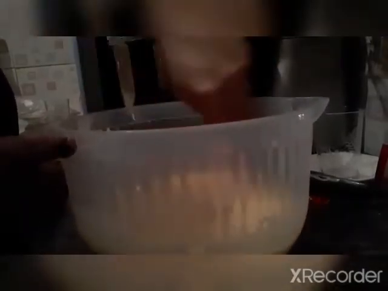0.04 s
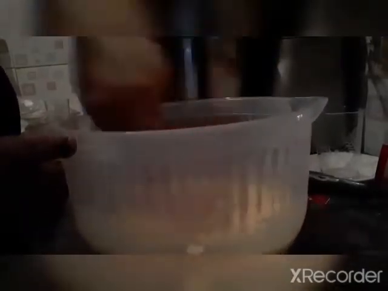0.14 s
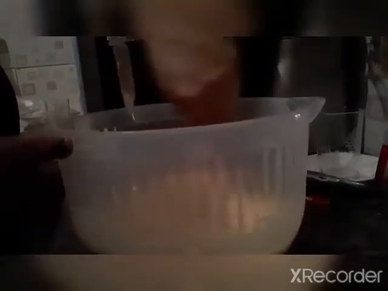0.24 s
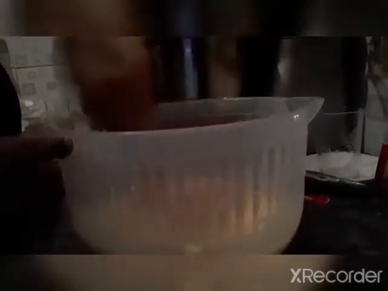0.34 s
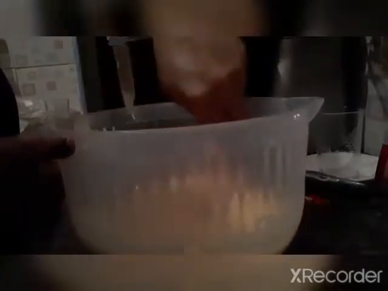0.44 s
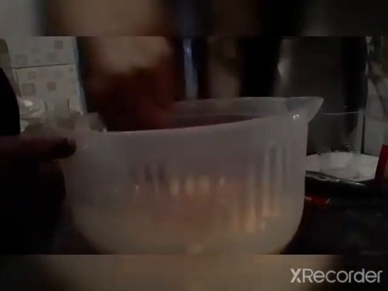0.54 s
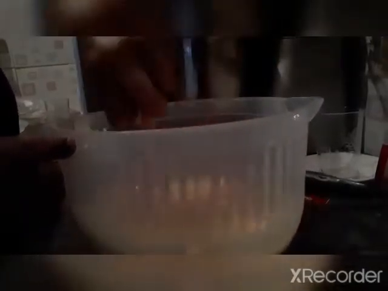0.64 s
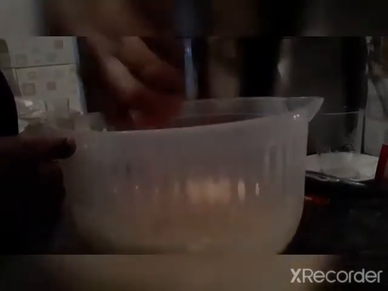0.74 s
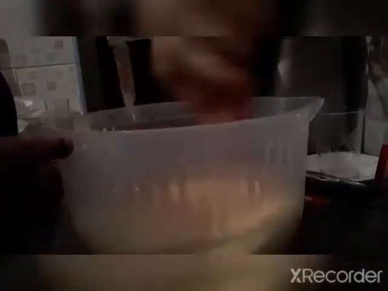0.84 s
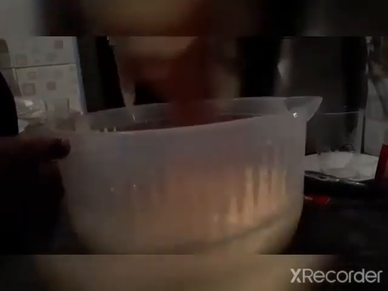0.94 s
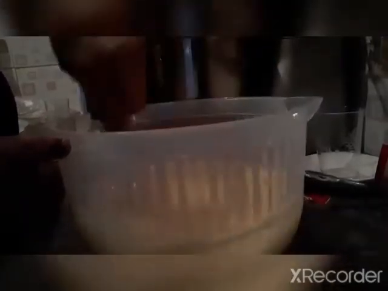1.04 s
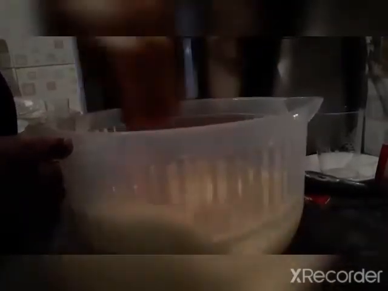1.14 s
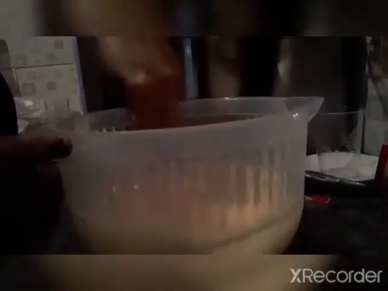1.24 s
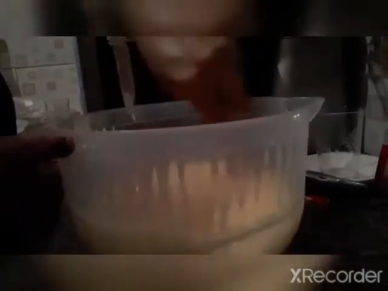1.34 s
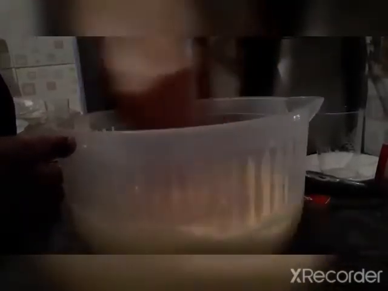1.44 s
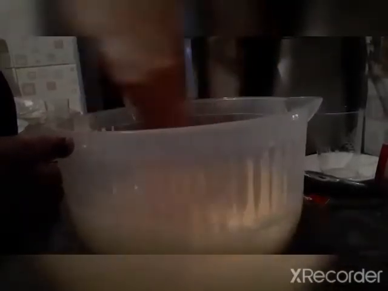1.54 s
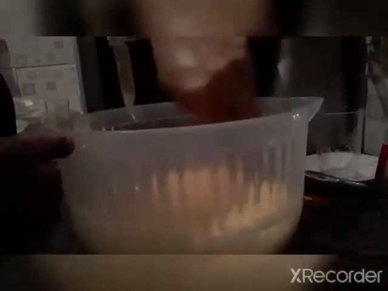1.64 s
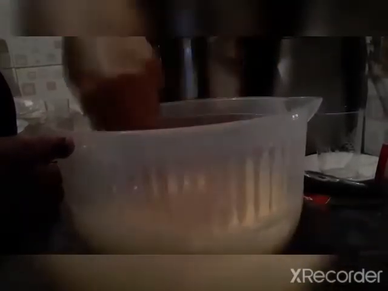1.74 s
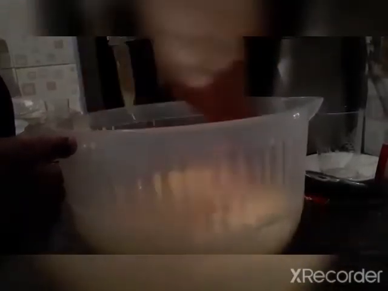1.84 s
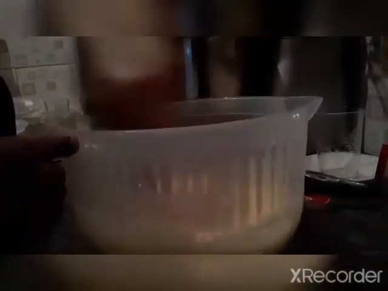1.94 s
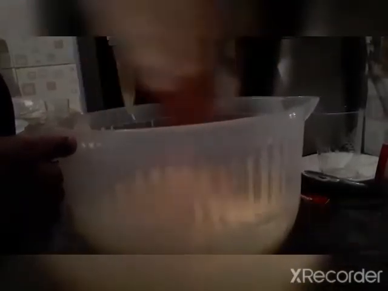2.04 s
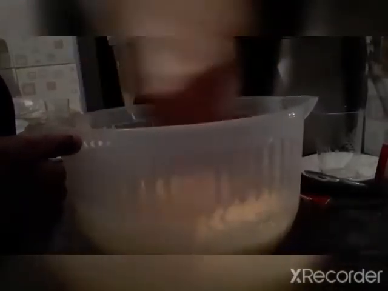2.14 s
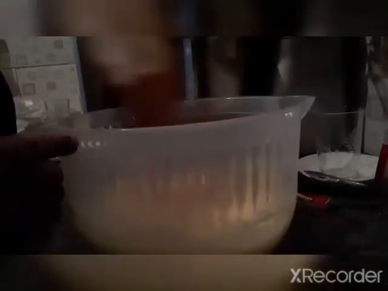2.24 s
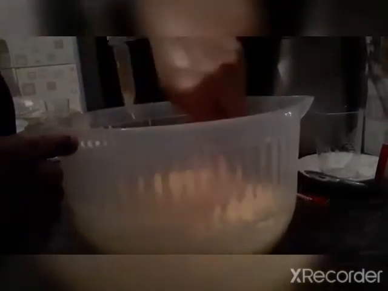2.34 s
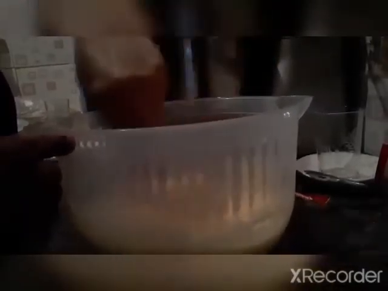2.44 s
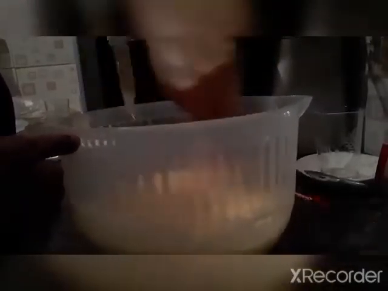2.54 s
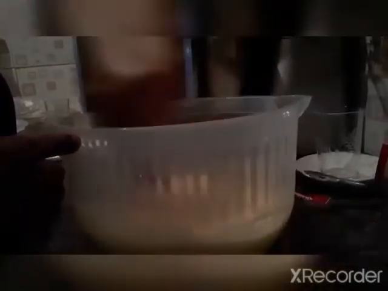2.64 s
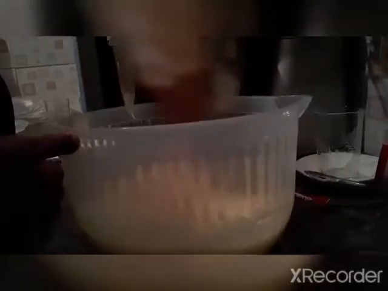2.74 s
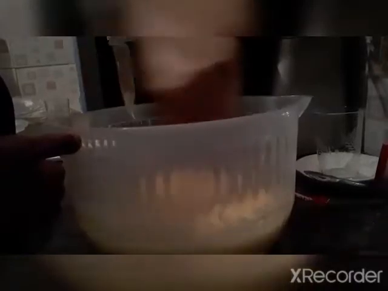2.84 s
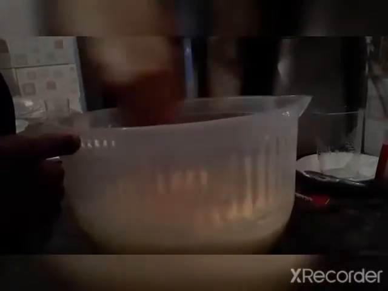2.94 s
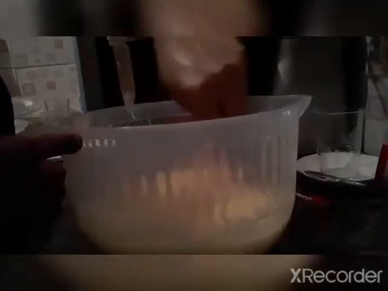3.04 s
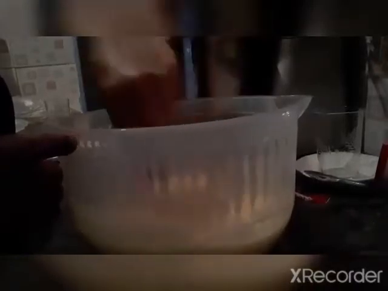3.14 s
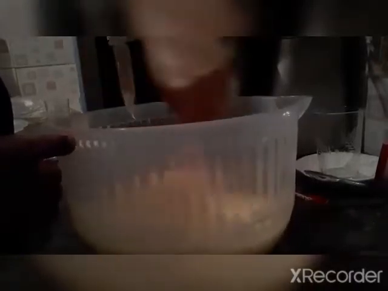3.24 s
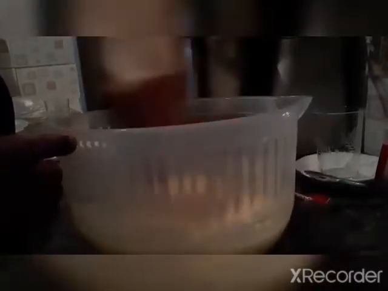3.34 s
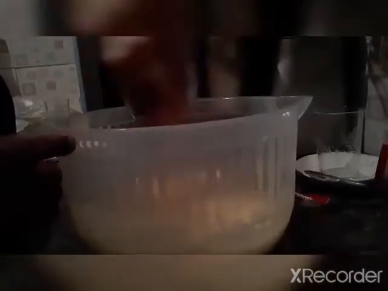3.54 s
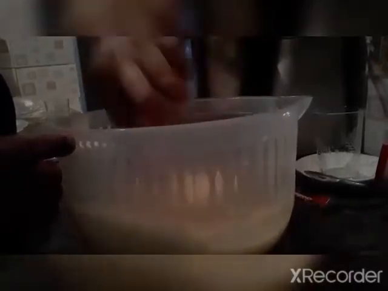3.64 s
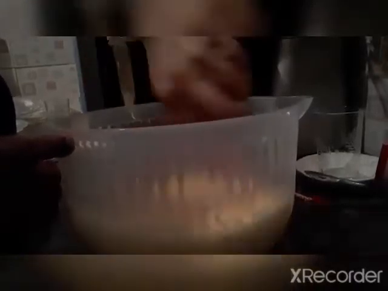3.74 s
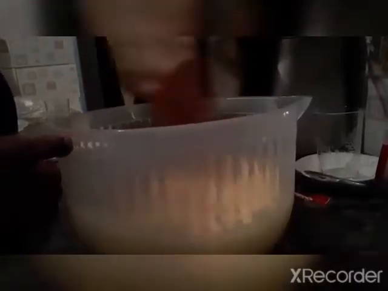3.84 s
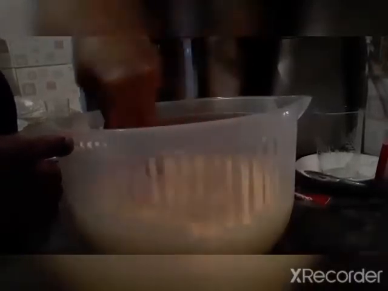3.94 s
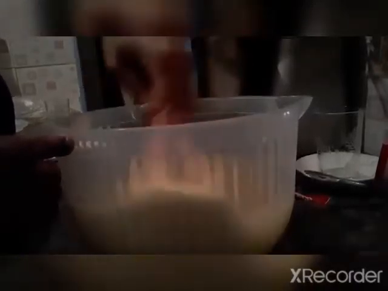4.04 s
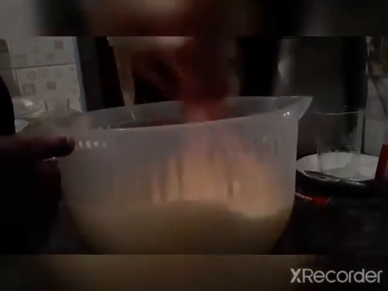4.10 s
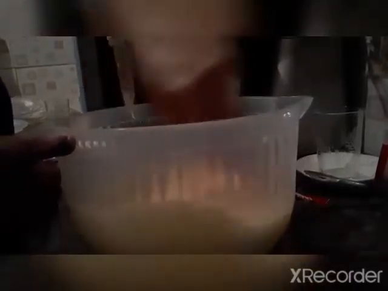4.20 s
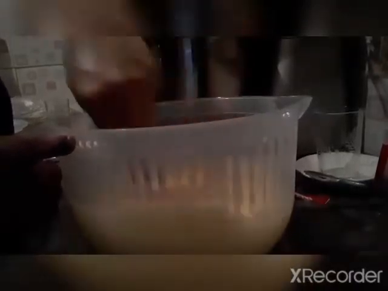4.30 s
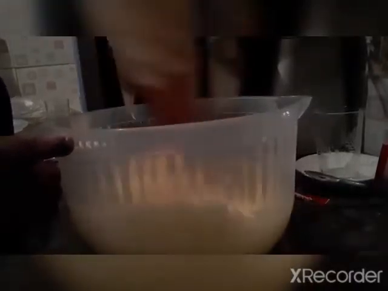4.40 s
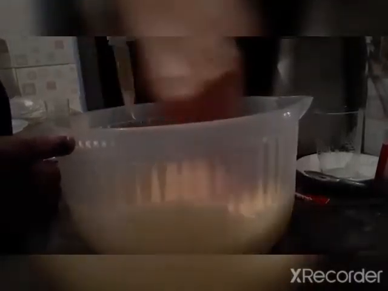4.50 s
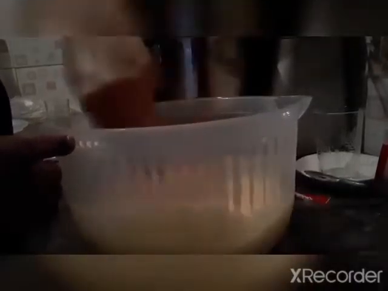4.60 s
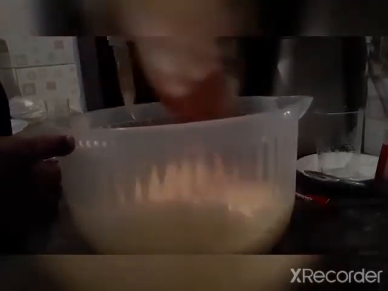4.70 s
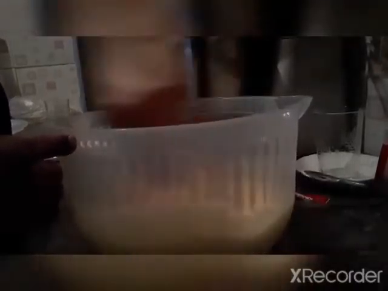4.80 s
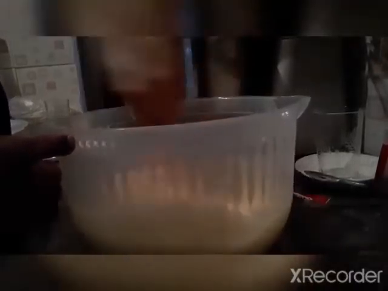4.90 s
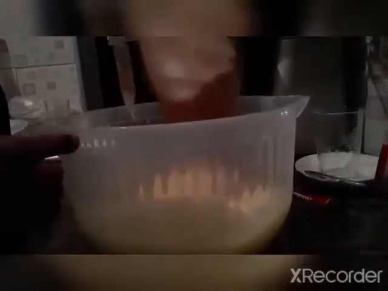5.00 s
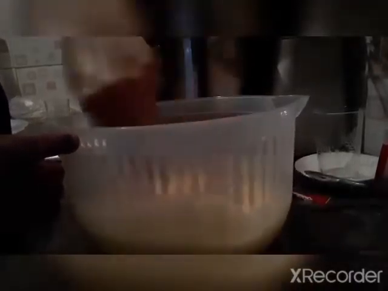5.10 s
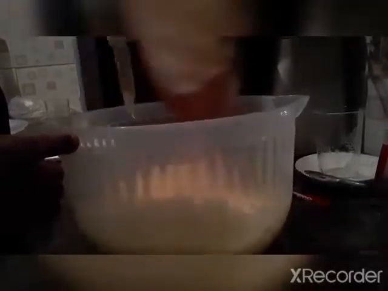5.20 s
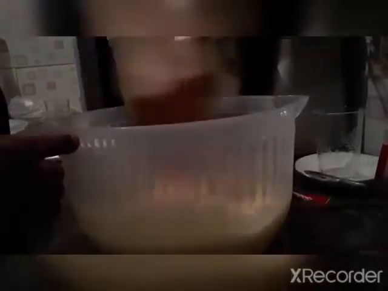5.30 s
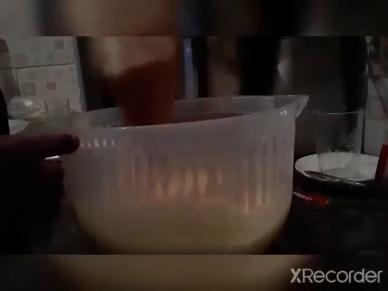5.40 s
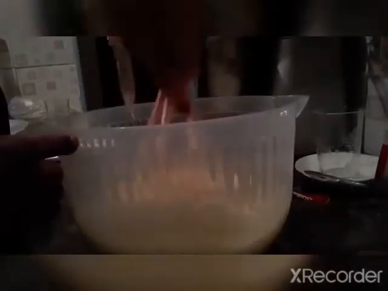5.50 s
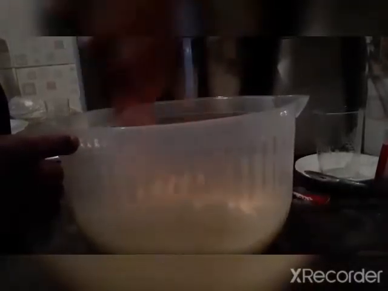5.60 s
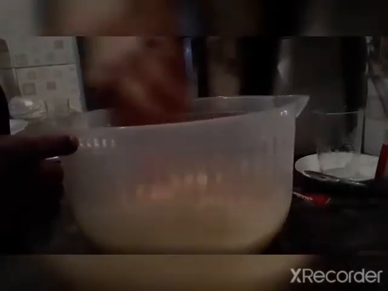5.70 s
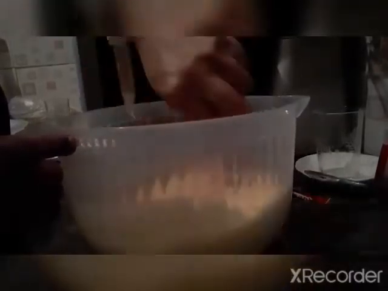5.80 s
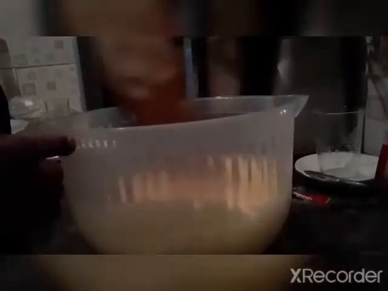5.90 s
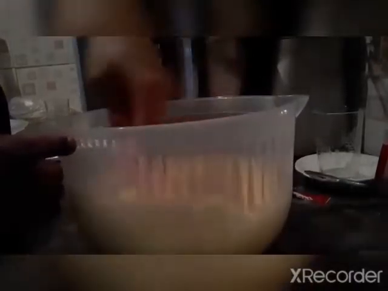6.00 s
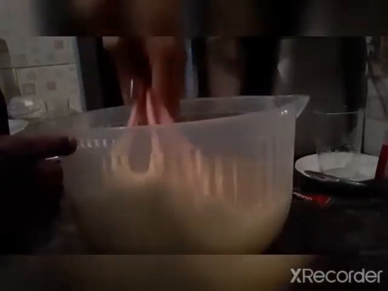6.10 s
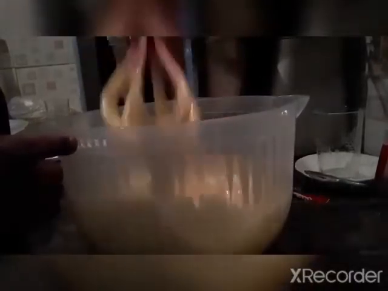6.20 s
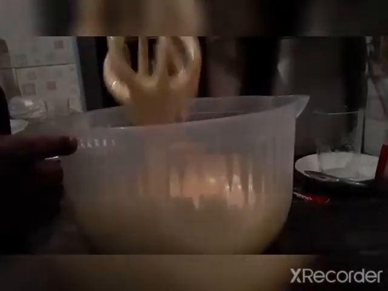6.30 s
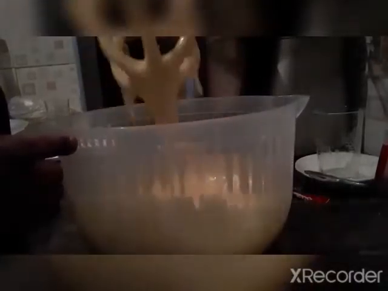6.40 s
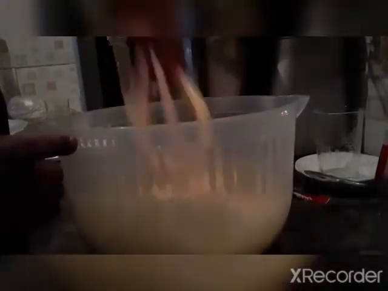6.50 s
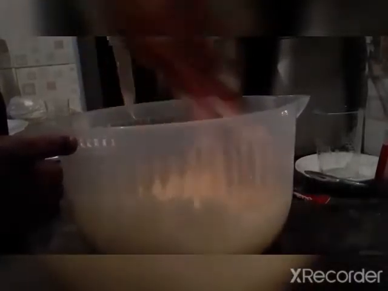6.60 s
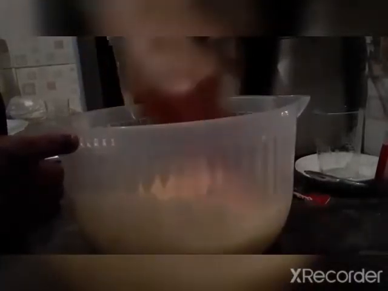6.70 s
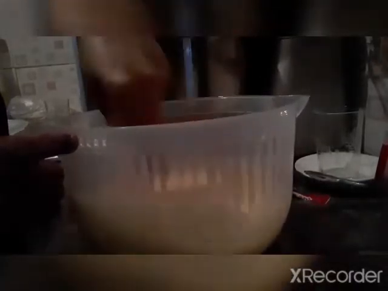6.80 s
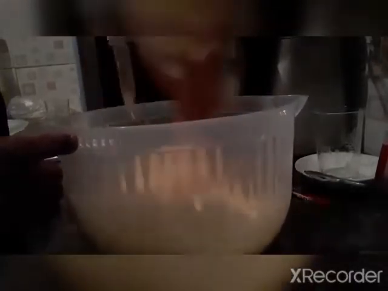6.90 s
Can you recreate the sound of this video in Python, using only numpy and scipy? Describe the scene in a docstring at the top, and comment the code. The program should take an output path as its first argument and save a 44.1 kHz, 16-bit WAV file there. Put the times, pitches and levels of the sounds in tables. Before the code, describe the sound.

Close, busy whisking of batter in a hollow plastic bowl: clacks, wiry ticks, wet scrapes and low plops in a small kitchen.

```python
"""A wire whisk beats thick batter in a plastic bowl on a kitchen counter, close to small stereo ports.
Wires strike the bowl as short noisy forces through resonances; scrape, churn and crackle are random grains
through the wall, the bowl and a wet colour, swelling with each sweep. Batter slaps the bowl or folds over
an air pocket: short low plops and bowl tones, sines rising slightly in pitch, with a noisy bowl shake.
The bowl booms, a small kitchen answers with decaying noise, over rumble and faint hiss."""
import sys
import numpy as np
from scipy import signal
from scipy.fft import rfft, irfft, next_fast_len
from scipy.io import wavfile
from scipy.ndimage import map_coordinates

SR = 44100
rng = np.random.default_rng(int(sys.argv[2]) if len(sys.argv) > 2 else 0)


def master_out(mix):
    """Clip the mix to full scale and print it as 16-bit PCM to the path in sys.argv[1]."""
    frames = np.transpose(np.atleast_2d(mix))
    ceiling = np.clip(frames, -1, 1)
    pcm = np.round(ceiling * 32767).astype(np.int16)
    wavfile.write(sys.argv[1], SR, pcm)


N = 306495


def amp(db):
    """Decibels to gain."""
    return 10 ** (np.asarray(db) / 20)


def unit(x):
    """Scale to rms 1."""
    return x / np.sqrt(np.mean(x ** 2) + 1e-20)


def along(points, hz):
    """Interpolate (Hz, value) points on a log frequency axis."""
    point_hz, values = np.transpose(points)
    return np.interp(np.log(hz + 1), np.log(point_hz + 1), values)


def wobble(knots_per_s):
    """Smooth random curve through normal knots."""
    knots = rng.standard_normal(int(N * knots_per_s / SR) + 4)
    return map_coordinates(knots, [np.arange(N) * knots_per_s / SR])


def grains(per_s, spread_db):
    """Random one-sample impulses of very unequal sizes."""
    present = rng.random(N) < per_s / SR
    sign = np.sign(rng.standard_normal(N))
    return present * sign * amp(spread_db * np.clip(rng.standard_normal(N), -2, 2))


def filtered(x, response):
    """Apply a complex frequency response."""
    n = x.shape[-1]
    m = next_fast_len(n + SR // 5, real=True)
    return irfft(rfft(x, m) * response(np.fft.rfftfreq(m, 1 / SR)), m)[..., :n]


def causal(x, gain):
    """Minimum-phase filter from a gain curve: all ringing follows its cause."""
    size = 8192
    cepstrum = irfft(np.log(np.maximum(gain(np.fft.rfftfreq(size, 1 / SR)), 1e-6)))
    # fold onto positive time
    cepstrum[1:size // 2] *= 2
    cepstrum[size // 2 + 1:] = 0
    response = irfft(np.exp(rfft(cepstrum)))
    response = response.reshape((1,) * (x.ndim - 1) + (-1,))
    return signal.fftconvolve(x, response, axes=-1)[..., :x.shape[-1]]


def coloured(x, spectrum):
    """Filter by a (Hz, dB) colour."""
    return causal(x, lambda hz: amp(along(spectrum, hz)))


def resonate(x, modes, low_hz, high_hz):
    """Modes add in power; the body radiates mainly between low_hz and high_hz."""
    def gain(hz):
        power = sum((amp(db) * hz * width) ** 2 / ((centre ** 2 - hz ** 2) ** 2 + (hz * width) ** 2)
                    for centre, width, db in modes)
        edges = (1 + (low_hz / (hz + 1)) ** 6) * (1 + (hz / high_hz) ** 6)
        return np.sqrt(power / edges)
    return causal(x, gain)


def place(times_s, levels_db, sounds):
    """Lay sounds on the time line, each at its rms level over its first 10 ms."""
    out = np.zeros(N + SR)
    for time_s, db, sound in zip(times_s, levels_db, sounds):
        first_rms = np.sqrt(np.mean(sound[:SR // 100] ** 2))
        out[max(round(time_s * SR), 0):][:len(sound)] += amp(db) * sound / first_rms
    return out[:N]


def blows(contact_s, chatter_db, chatter_t60_s, snap):
    """Force of each blow: first snap, short rough contact, then weaker chatter."""
    t = np.arange(SR // 4) / SR
    shape = np.exp(-t / contact_s[:, None]) + amp(chatter_db - 60 * t / chatter_t60_s)
    force = rng.laplace(size=shape.shape) * shape
    force[:, 0] = snap * np.linalg.norm(force, axis=1)
    return force


# steady background colour: (frequency [Hz], gain [dB])
QUIET_COLOUR = [(15, -55), (25, -48), (114, -2), (157, -13), (249, -15.5), (309, -8), (677, -20.5),
                (1840, -24.5), (2600, -33), (3520, -35.5), (5880, -32.5), (16000, -30)]


def hiss(rms_db=-57):
    """Steady low rumble of the house and faint hiss: noise partly shared by both sides."""
    shared, left, right = coloured(rng.standard_normal((3, N)), QUIET_COLOUR)
    return amp(rms_db) * unit(shared + 1.2 * np.array([left, right]))


# modes of the loaded bowl on the counter: (frequency [Hz], width [Hz], level [dB])
BOWL_MODES = [(70, 105, 0), (111.1, 10.2, 6), (188, 8.7, 0), (296.8, 12.6, 7.5), (341.2, 44, 6.5),
              (390, 15, 6), (556, 79, -8), (588.4, 44, 7.5), (694, 52, 3), (825, 43, -28)]


def ring_bowl(x, low_hz, high_hz):
    """Low modes of the loaded bowl boom under a force."""
    return resonate(x, BOWL_MODES, low_hz, high_hz)


# modes of the plastic wall: (frequency [Hz], width [Hz], level [dB])
WALL_MODES = [(1249, 190, -4.5), (1492, 150, -1), (1640, 180, 0), (1986, 180, -1), (2250, 360, -5.5),
              (2390, 42, 2), (2980, 540, -6)]


def ring_wall(x, low_hz, high_hz):
    """Higher modes of the plastic wall clack or scrape under a force."""
    return resonate(x, WALL_MODES, low_hz, high_hz)


# whisk in the batter: (start [s], end [s], churn level [dB], wet crackle level [dB])
BOUTS = [(-0.02, 0.548, -37, -45), (0.692, 0.73, -44, -55), (0.823, 1.14, -47, -53.5),
         (1.208, 1.537, -41.5, -46), (1.577, 3.355, -39, -45), (3.639, 3.974, -47.5, -54),
         (4.16, 5.126, -43, -52.5), (5.152, 5.376, -42, -49.5), (5.666, 6.019, -45, -52),
         (6.02, 6.15, -58.5, -64.5), (6.636, 6.807, -37.5, -49.5)]
# wires sweep along the wall:
# (middle [s], scrape level [dB], half width to -7 dB [s], crackle re scrape [dB])
SWEEPS = [(0.147, -34, 0.026, 0), (0.265, -36.5, 0.021, -3), (0.472, -32.5, 0.015, 0),
          (0.585, -36.5, 0.0078, -1), (1.011, -41.5, 0.016, 1), (1.271, -43, 0.037, 0.5),
          (1.46, -38, 0.046, 0.5), (1.645, -39, 0.047, 0), (1.7, -35.5, 0.027, -1), (1.83, -50, .02, 6),
          (1.942, -33, 0.013, 3), (2.08, -45, 0.023, -4), (2.162, -33.5, 0.033, -1),
          (2.304, -43, 0.09, 1.5), (2.403, -40, 0.016, 6.5), (2.555, -41.5, .025, -1.5),
          (2.625, -32.5, 0.018, 1), (2.869, -36, 0.029, 4), (2.999, -39, 0.042, -0.5),
          (3.106, -37, 0.019, 3), (3.25, -39, 0.016, -8), (3.344, -35.5, 0.0099, -2),
          (3.456, -45.5, 0.021, 0.5), (3.952, -45.5, 0.035, 3.5), (4.292, -39.5, 0.05, 2.5),
          (4.471, -37, 0.022, -4.5), (4.569, -37.5, 0.06, -1), (4.807, -38.5, 0.085, 0.5),
          (4.987, -41, 0.052, -1.5), (5.075, -41, 0.033, 4), (5.33, -34.5, 0.025, -1),
          (5.794, -51, .03, 4.5), (5.945, -45, 0.031, 8), (6.558, -68, 0.011, 9), (6.756, -37.5, 0.053, -1)]


def whisking(dip_s=0.0067, settle_db_per_s=125.5, drain_db_per_s=160, sweep_churn_db=-5, rub_db=-1.5):
    """Strengths of churn, scrape and crackle: steady in the batter, swelling with each sweep."""
    t = np.arange(N) / SR

    def held(start_s, end_s, fall_db_per_s):
        dig_in = np.clip((t - start_s) / dip_s, 0, 1)
        return dig_in * amp(-fall_db_per_s * np.maximum(t - end_s, 0))

    churn = np.max([amp(db) * held(start, end, settle_db_per_s) for start, end, db, _ in BOUTS], axis=0)
    wet = np.max([amp(db) * held(start, end, drain_db_per_s) for start, end, _, db in BOUTS], axis=0)
    scrape_power, crackle_power = np.zeros((2, N))
    for middle_s, db, half_s, crackle_db in SWEEPS:
        swell = amp(db) / (1 + ((t - middle_s) / half_s) ** 2 / 2) ** 2
        scrape_power += swell ** 2
        crackle_power += (amp(crackle_db) * swell) ** 2
    scrape, crackle = np.sqrt(scrape_power), np.sqrt(crackle_power)
    # a sweep pushes batter ahead of it; between sweeps the wires rub lightly on the wall
    churning = np.hypot(amp(sweep_churn_db) * scrape, churn)
    scraping = np.hypot(scrape, amp(rub_db) * wet)
    return churning, scraping, np.hypot(crackle, wet)


# wet crackle colour: (frequency [Hz], gain [dB])
CRACKLE_COLOUR = [(600, -11), (2000, -4.5), (3600, 3), (5700, 0), (7000, -5.5), (9000, -4.5), (10500, -6),
                  (13000, -3.5), (16000, -16)]


def stirring(slosh_ref_db=-37, slosh_growth_db_per_db=0.1):
    """Batter churns against the bowl, wires stick and slip on the wall, tiny bubbles crackle."""
    churning, scraping, crackling = whisking()
    wire_pass = wobble(60)  # one wire after another drags through
    slips = unit(grains(per_s=2600, spread_db=5.5) * amp(2.2 * wire_pass))
    # deep slosh and patter on the side come and go independently
    slosh_force = grains(per_s=200, spread_db=4.5) * amp(2.9 * wobble(25))
    slosh = unit(ring_bowl(slosh_force, low_hz=53, high_hz=413))
    patter_force = grains(per_s=260, spread_db=1.5) * amp(2 * wire_pass + 1.33 * wobble(25))
    patter = unit(ring_bowl(patter_force, low_hz=480, high_hz=974))
    # stronger churn favours the slosh
    slosh_gain = (churning / amp(slosh_ref_db)) ** slosh_growth_db_per_db
    churn = slosh * slosh_gain + 0.77 * patter
    bursts = unit(grains(per_s=41, spread_db=3))  # larger bubbles or sharper slips
    scrape = ring_wall(slips + 0.36 * bursts, low_hz=824, high_hz=4670)
    bubbles = unit(grains(per_s=9100, spread_db=17.0))
    crackle = coloured(slips + 1.1 * bubbles + 0.19 * bursts, CRACKLE_COLOUR)
    return churning * unit(churn), scraping * unit(scrape), crackling * unit(crackle)


# wires hit the bowl:
# (time [s], bowl knock [dB], wall clack [dB], wire tick [dB], contact decay constant [s])
CONTACTS = [(0.0202, -27.5, -25.5, -37, 0.0011), (0.109, -41, -27, -32, 0.001),
            (0.2754, -32.5, -30, -39, 0.0016), (0.3554, -23.5, -26, -28, 0.0028),
            (0.439, -52, -31, -34, 0.0022), (0.4587, -21, -30, -43, 0.00076),
            (0.5132, -40, -29.5, -41.5, 0.00031), (0.698, -52, -52, -38.5, .0006),
            (0.8044, -29, -35.5, -30, 0.0031), (0.808, -31.5, -32, -36, 0.0012),
            (0.894, -45, -48, -50, 0.0011), (1.0064, -29, -38.5, -33.5, 0.016),
            (1.0605, -39.5, -39.5, -36.5, 0.00031), (1.2197, -29, -40.5, -39.5, 0.00052),
            (1.409, -34, -37.5, -39, 0.00042), (1.687, -30.5, -36, -49, 0.0013),
            (1.7157, -33.5, -30, -32.5, 0.00057), (1.8124, -26, -25.5, -40.5, 0.00057),
            (1.898, -27.5, -27.5, -36.5, 0.00014), (2.0064, -37, -47, -38.5, 0.0018),
            (2.0507, -31, -30.5, -38, 0.0019), (2.1737, -33, -23.5, -19.5, 0.004),
            (2.3269, -32, -28, -33, 0.0015), (2.4088, -57, -32.5, -37, 0.0018),
            (2.5038, -26.5, -25, -29.5, 0.012), (2.548, -48, -28, -38, 0.0014),
            (2.746, -31, -29, -27, 0.0058), (2.879, -32, -30, -25.5, 0.0018),
            (2.988, -24, -28, -37, 0.0088), (3.217, -34, -27, -30.5, 0.0025),
            (3.306, -42, -36.5, -39, 0.0016), (3.735, -36.5, -41, -37.5, 0.00054),
            (3.7651, -38.5, -41, -39, 0.0021), (3.859, -41.5, -42.5, -45, 0.0012),
            (4.174, -41, -34, -42.5, .0015), (4.3928, -27.5, -34.5, -36.5, 0.006),
            (4.5678, -56, -46, -28, 0.0023), (4.6593, -30, -34.5, -41, 0.0024),
            (4.7534, -30, -25, -35.5, 0.0019), (4.8219, -38, -33, -35, 0.0036),
            (4.911, -31.5, -31.5, -28.5, 0.0026), (4.9624, -44, -29.5, -36, 0.00036),
            (5.2101, -29.5, -26.5, -37.5, 0.0021), (5.269, -53, -43, -36.5, 0.00092),
            (5.325, -34, -28, -36, 0.00083), (5.653, -29, -30, -45, 0.00054),
            (5.727, -62, -41, -31, 0.00082), (5.778, -44.5, -42, -44.5, .002),
            (5.822, -38, -45.5, -53, .001), (5.8343, -57, -57, -38.5, 0.00044),
            (5.901, -35.5, -37, -29, 0.0072), (5.9431, -28.5, -24.5, -36, 0.00066),
            (6.619, -59, -51, -45.5, 0.0031), (6.6469, -26, -32.5, -51, 0.0019)]
# bright wire colour: (frequency [Hz], gain [dB])
WIRE_COLOUR = [(900, -39.5), (2500, 4), (3800, 5.5), (4600, 13), (5000, 6.5), (5900, 9), (7000, -1),
               (7500, 2.5), (10000, 0), (13000, 2), (16000, -13)]


def contacts(bare_share=0.49, bare_span_db=16):
    """Each contact booms the bowl, clacks the wall and ticks the wires: three signals."""
    time_s, knock_db, clack_db, tick_db, contact_s = np.transpose(CONTACTS)
    # the other wires chatter after the first
    push = blows(contact_s, chatter_db=-17, chatter_t60_s=0.1, snap=0.7)
    rattle = blows(contact_s, chatter_db=-21, chatter_t60_s=0.07, snap=0.55)
    knock = ring_bowl(push, low_hz=153, high_hz=816)
    clack = ring_wall(rattle, low_hz=1160, high_hz=4150)
    # a bare wire that hardly moves the wall ticks brighter than one coated in batter
    bare = np.clip(bare_share + (tick_db - clack_db) / bare_span_db, 0, 1)
    previous = np.pad(rattle, ((0, 0), (1, 0)))[:, :-1]
    tick = coloured(rattle - bare[:, None] * previous, WIRE_COLOUR)
    return place(time_s, knock_db, knock), place(time_s, clack_db, clack), place(time_s, tick_db, tick)


# batter slaps the bowl or folds over an air pocket: (time [s], tone level [dB], starting pitch [Hz])
PLOPS = [(0.0429, -29, 365), (0.056, -31, 107), (0.249, -26.5, 395), (0.2688, -27, 122), (0.4594, -30, 375),
         (0.486, -14, 272), (0.4971, -19.5, 202), (0.5837, -31, 350), (0.7408, -34, 137), (1.024, -40, 118),
         (1.3682, -37.5, 314), (1.5933, -34.5, 355), (1.8291, -30.5, 360), (1.841, -32, 136),
         (2.153, -25.5, 312), (2.205, -28.5, 600), (2.287, -30.5, 350), (2.509, -19.5, 594),
         (2.525, -28, 125), (2.708, -34.5, 593), (2.9635, -33, 583), (3.01, -32, 200), (3.0262, -27, 126),
         (3.322, -33, 115), (3.3478, -29, 368), (3.6513, -32.5, 302), (3.677, -33, 308), (3.952, -34, 609),
         (4.328, -32.5, 304), (4.3535, -33, 560), (4.4622, -32.5, 354), (4.6206, -30.5, 575),
         (4.7174, -28, 590), (4.761, -31, 109), (4.9154, -30.5, 600), (4.964, -31.5, 355),
         (5.324, -26, 334), (5.656, -29, 576), (5.699, -29.5, 301), (5.948, -28, 565), (6.653, -30.5, 135),
         (6.811, -31, 302), (6.876, -36.5, 316)]


def plops(glide=0.013, bowl_db=-5, ref_life_s=0.04, ref_db=-31, life_halves_db=7.5):
    """Short low plops and bowl tones, pitch rising slightly, with a bowl shake; louder ones die sooner."""
    time_s, db, hz = np.transpose(PLOPS)
    t = np.arange(SR // 4) / SR
    life_s = ref_life_s * 2 ** ((ref_db - db) / life_halves_db)  # time to fall 30 dB
    age = t / life_s[:, None]
    cycles = hz[:, None] * t * (1 + glide * np.minimum(age, 1))
    onset = 1 - np.exp(-t / 0.0005)
    tone = np.sin(2 * np.pi * cycles) * amp(-30 * age) * onset
    # the push decays over about one cycle
    push = blows(1 / hz, chatter_db=-4, chatter_t60_s=0.069, snap=0.17)
    shake = ring_bowl(push, low_hz=48.0, high_hz=685)
    return place(time_s, db, tone) + place(time_s, db + bowl_db, shake)


# lowest room mode: (frequency [Hz], t60 [s], level [dB])
ROOM_MODE = (114, 1, 4.5)


def standing_wave(x):
    """One low room mode keeps humming after each boom."""
    hz, t60_s, db = ROOM_MODE
    t = np.arange(SR) / SR
    decay = amp(-60 * t / t60_s)
    ring = 2 * np.cos(2 * np.pi * hz * t) * decay / decay.sum()
    return amp(db) * signal.fftconvolve(x, ring)[:N]


def inside(x, echo_db, echo_t60_s=0.016):
    """Short waves bounce in the bowl, differently for each port and each place of the whisk."""
    size = 512  # samples per whisk place
    count = N // size + 1
    t = np.arange(size) / SR
    walls = rng.standard_normal((2, count, size)) * amp(-60 * t / echo_t60_s)
    walls /= np.linalg.norm(walls, axis=2, keepdims=True)
    moments = np.pad(x, (0, count * size - N)).reshape(count, size)
    rung = irfft(rfft(moments, 2 * size) * rfft(walls, 2 * size))
    rung[:, 1:, :size] += rung[:, :-1, size:]  # overlap-add
    echoes = rung[..., :size].reshape(2, -1)[:, :N]
    return (x + amp(echo_db) * echoes) / np.hypot(1, amp(echo_db))


def ports(x, left_db, lead_ms):
    """Sound reaches the left microphone port a little before the right, at a slightly different level."""
    sides = np.array([[1], [-1]])
    shifted = filtered(x, lambda hz: np.exp(np.pi * 1j * hz * lead_ms / 1000 * sides))
    return shifted * amp(sides * left_db / 2)


# reverberation of the small kitchen: (frequency [Hz], t60 [s])
KITCHEN_T60 = [(100, 0.27), (300, 0.26), (1500, 0.2), (6000, 0.11), (15000, 0.17)]


def kitchen(x):
    """The small room's answer: stereo noise tail, each frequency dying at its own speed."""
    hz, t, noise = signal.stft(rng.standard_normal((2, SR // 2)), SR, nperseg=256)
    decay = amp(-60 * t / along(KITCHEN_T60, hz)[:, None])
    tail = signal.istft(noise * decay, SR, nperseg=256)[1]
    tail = np.pad(tail, ((0, 0), (SR // 160, 0)))  # about 6 ms before the answer
    return signal.fftconvolve(x, tail / np.linalg.norm(tail[0]), axes=1)[:, :N]


def scene():
    """Bowl, wall and wires each radiate into the kitchen in their own way."""
    background = hiss()
    churn, scrape, crackle = stirring()
    knock, clack, tick = contacts()
    boom = knock + plops() + churn
    bowl = ports(boom + standing_wave(boom), left_db=-1.5, lead_ms=0.23)
    wall = ports(inside(clack + scrape, echo_db=-0.5), left_db=0.05, lead_ms=0.11)
    wires = ports(inside(tick + crackle, echo_db=0), left_db=-0.35, lead_ms=0.13)
    room = kitchen(amp(-13.5) * bowl + amp(-9) * (wall + wires))
    return bowl + wall + wires + room + background


def record(dry, bass_cut_hz=40, top_hz=16250):
    """The small microphone loses the deepest bass and keeps nothing above its band limit."""
    highpass = signal.butter(3, bass_cut_hz, "highpass", fs=SR, output="sos")
    thin = signal.sosfilt(highpass, dry)
    return filtered(thin, lambda hz: hz < top_hz)


dry = scene()
out = record(dry)
master_out(out)
```